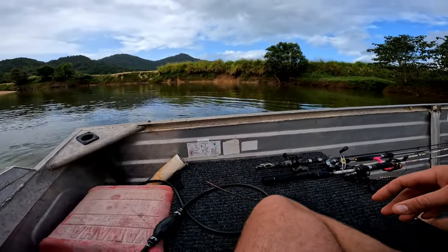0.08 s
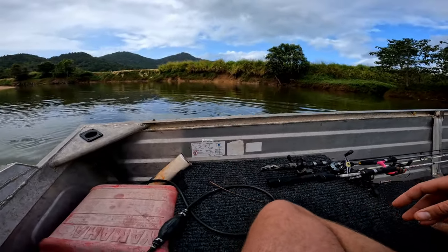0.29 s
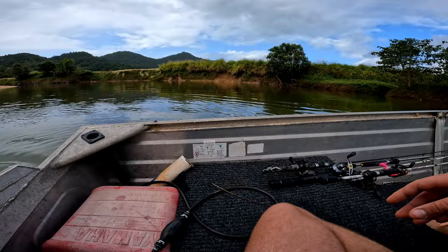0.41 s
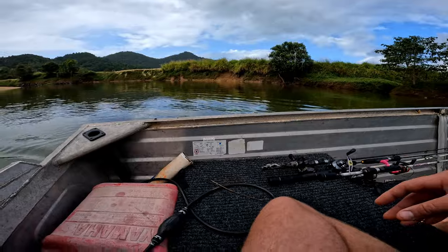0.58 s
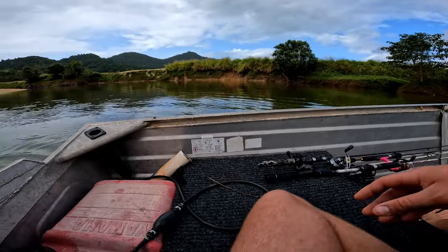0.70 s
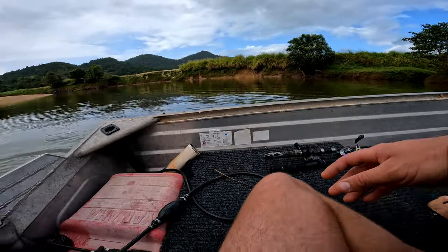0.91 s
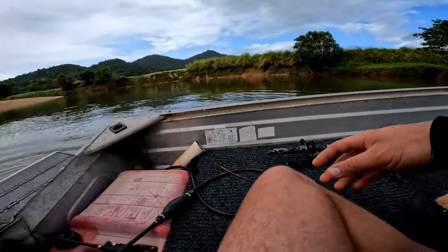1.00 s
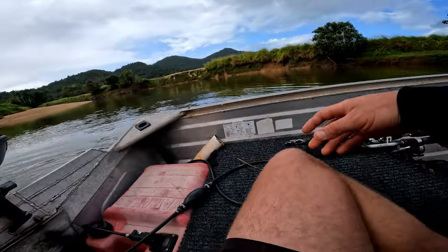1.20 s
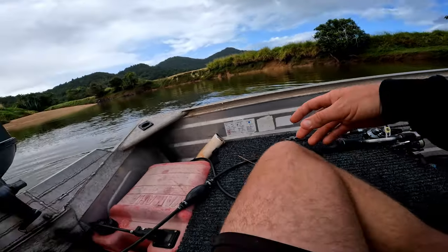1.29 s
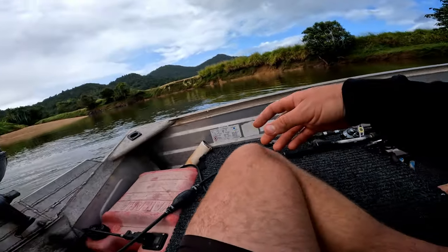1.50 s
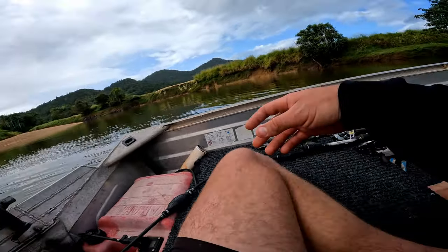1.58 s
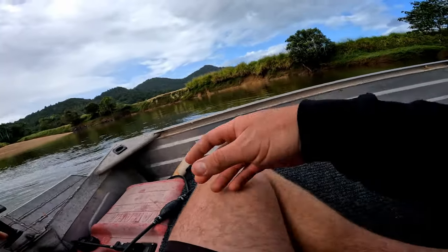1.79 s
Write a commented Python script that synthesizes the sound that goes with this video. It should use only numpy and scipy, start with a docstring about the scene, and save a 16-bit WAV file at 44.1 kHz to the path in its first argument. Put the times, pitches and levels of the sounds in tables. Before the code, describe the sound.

Something heavy shifts in a small aluminium boat, thudding, cracking and scraping on the hull in a quick burst; then a sleeve brushes, lighter knocks and two tiny metal clinks follow, heard close from a body-worn microphone outdoors.

```python
"""Inside a small aluminium boat adrift on a river, the motor silent: filtered noise for water and air, sines for hull hum.
Something heavy is shifted and knocks on the hull in a dense run of thuds; struck modes and noise boom and rattle.
Gliding tones squeak, rough noise scrapes between the blows, and hard contacts crack and ring, two after a brief slide.
Then a sleeve brushes past as smoother noise; lighter knocks follow at about one second, then more with
two clinks of a small metal fitting, made of decaying sines."""
import sys
import numpy as np
from scipy import signal
from scipy.fft import rfft, irfft, next_fast_len
from scipy.io import wavfile
from scipy.ndimage import uniform_filter1d

SR = 44100
rng = np.random.default_rng(int(sys.argv[2]) if len(sys.argv) > 2 else 0)


def file_out(sig):
    """Save sig as 16-bit WAV at sys.argv[1]."""
    # one column per channel
    cols = np.atleast_2d(sig).T
    # limit, then scale
    lim = np.clip(cols, -1, 1)
    pcm = np.round(lim * 32767).astype(np.int16)
    wavfile.write(sys.argv[1], SR, pcm)


N = 81585

# water washing along the hull: t/s, level/dB
WASH_LEVEL = [(0, -44.5), (0.15, -56.5), (0.5, -59.5), (0.8, -49), (1.0, -57.5), (1.3, -52.5), (1.5, -47.5),
              (1.6, -47.5), (1.72, -75), (1.82, -53)]
# tone of the wash: f/Hz, level/dB
WASH_COLOUR = [(30, 4), (60, -2.5), (120, -3), (330, -3.5), (440, -6), (580, -18), (1000, -34),
               (3000, -53.5), (15000, -76.5)]
# tone of the still outdoor air: f/Hz, level/dB
AIR_COLOUR = [(20, -3), (32, -3), (70, -1.5), (160, -13), (380, -28.5), (650, -45), (1000, -40),
              (1450, -36), (2500, -47), (3800, -50), (5300, -44.5), (8000, -53), (15000, -60.5)]
AIR_DB = -45.5

# swells and dips of the hull's hum: t/s, level/dB
HUM_LEVEL = [(0, -35.5), (0.2, -67), (0.55, -32.5), (0.72, -38), (0.82, -35.5), (0.93, -41.5), (1.03, -43),
             (1.17, -39.5), (1.25, -39.5), (1.45, -40), (1.7, -43.5), (1.85, -45.5)]
# partials of the hum: f/Hz, level/dB, unsteadiness/0-1
HUM_PARTIALS = [(129.6, -1.5, 0.1), (58.7, -20.5, 0), (212.8, -24.5, 0.4), (270, -20, 0.26), (290, -31, .6)]

# heavy, soft blows on the hull: t/s, relative level/dB, centre f/Hz,
# spread to each side/octaves, gain of hull ring and boom/dB
THUDS = [(0.0, -9.5, 217.6, 0.24, -7), (0.028, -15, 227, 0.097, -25), (0.179, -15.5, 183, 0.56, 3),
         (0.206, -3, 185, 1.2, 6.5), (0.224, -6, 343, 0.47, -11), (0.244, -10.5, 123, 0.97, 9),
         (0.294, -9, 170, 1.37, -4.5), (0.3296, 0, 150.4, 1.66, 1), (0.361, -20.5, 201, 0.85, -5.5),
         (0.386, -9, 153, 0.86, 4.5), (0.417, -15, 139.4, 1, 0), (0.458, -18, 84.3, 0.99, 10.5),
         (1.072, -20.5, 115.3, 1.1, -8), (1.081, -19.5, 330, 0.53, 0), (1.121, -52, 197.4, 1.1, -10),
         (1.135, -32.5, 467, 0.25, -14), (1.547, -17, 267.5, 0.42, -9), (1.554, -14.5, 130.7, 1.07, -0.5),
         (1.574, -12.5, 137, 0.81, -13.5), (1.597, -23.5, 90.5, 1.1, 2), (1.64, -21, 199, 0.33, 3),
         (1.674, -22, 50, 0.78, 3)]
# broad, quickly damped resonances of floor and sides: f/Hz, relative level/dB, t60/s
PLATE_MODES = [(57.6, -4.5, 0.17), (100, -4.5, 0.28), (124, 3, 0.1885), (152.7, -7, 0.3),
               (160.2, -4.5, 0.13), (203.2, -3, 0.15), (260.3, -3.5, 0.15), (287.2, -5.5, 0.13),
               (321.2, -4.5, 0.19), (394.3, -8.5, 0.081), (436.2, -7.5, 0.21), (486.7, -5, 0.13),
               (520.8, -16.5, 0.26)]
# long rings of the whole hull: f/Hz, relative level/dB, t60/s
HULL_MODES = [(68.18, -8, 0.81), (96, -21.5, 1), (130.2, -16.5, 0.76), (165.4, -23.5, 0.28),
              (299.36, -17, 0.73), (570.6, -22, 0.75)]
RATTLE_DB, RATTLE_T60_S, RATTLE_TOP_HZ = -18.5, 0.14, 483
BOOM_DB, BOOM_T60_S, BOOM_TOP_HZ = -22, 0.7, 194.4  # before each blow's own ring gain
PUSH_S = 0.0015  # time constant of a soft blow's onset
PUSH_TOP = 1.445  # steep treble roll-off, as a multiple of the blow's upper band edge

# faint squeaks of things sliding on metal: t/s, half length/s, f/Hz, level/dB
SQUEAKS = [(0.165, .014, 800, -48), (0.11, .06, 1400, -64), (0.797, .009, 1170, -44),
           (1.413, .009, 1760, -55)]

# the load scraping on the hull: t/s, level/dB
SCRAPE_LEVEL = [(0.14, -68.5), (0.175, -52), (0.2, -34.5), (0.235, -31.5), (0.275, -31.5), (0.31, -27),
                (0.38, -38.5), (0.42, -46.5), (0.5, -58), (0.58, -72)]
# tone of the scrape: f/Hz, level/dB
SCRAPE_COLOUR = [(100, -19.5), (300, 6), (800, 2.5), (1600, -13.5), (3000, -20.5), (6000, -33.5),
                 (10000, -39), (15000, -46.5)]

# hard contacts: t/s, relative level/dB, low edge f/Hz, high edge f/Hz,
# relative treble snap level/dB, ring t60/s
CLACKS = [(0.1698, -22.5, 390, 830, -34, 0.043), (0.2025, -12, 970, 3000, -2.5, 0.0127),
          (0.207, -7, 300, 1530, -8.5, 0.066), (0.221, -25.5, 403, 1797, -1, 0.048),
          (0.241, -19, 400, 960, -24, .12), (0.262, -21, 500, 1350, -18, 0.16),
          (0.279, -18, 467, 1210, -12.5, 0.26), (0.289, -15, 600, 1850, -5.5, 0.035),
          (0.298, -15, 500, 1460, -22, 0.052), (0.3225, -8, 750, 1280, -19, 0.073),
          (0.333, -19, 300, 760, -39, 0.094), (0.352, -26.5, 697.7, 3500, -12.5, 0.067),
          (0.365, -24.5, 500, 1800, -27, 0.16), (0.382, -21, 600, 1250, -41, 0.053),
          (0.5885, -26.5, 850, 1340, -54, 0.087), (0.687, -40.5, 453.7, 1200, -20, 0.14),
          (0.7718, -27.5, 344, 1060, -14, 0.17), (1.0825, -28, 251, 750, -13.5, 0.086),
          (1.1351, -32, 450, 810, -18, .06), (1.541, -27, 815, 2820, -0.5, 0.066),
          (1.5761, -33, 1010, 3300, -3.5, 0.03), (1.594, -42, 330, 790, -21, 0.088),
          (1.624, -59.5, 900, 4000, 16, 0.075)]
# sheet-metal rings after a hard contact: f/Hz, relative level/dB, t60/s
SHEET_MODES = [(683, -3.5, 0.15), (774, -4.5, 0.075), (816, -2, 0.13), (913, 2, 0.059), (933, -0.5, 0.046),
               (1049, -6.5, .12), (1205, -6, 0.071), (1234, -9.5, 0.11), (1393, -10, 0.047),
               (1690, -3, 0.075), (1836, -5, 0.083), (2085, -16.5, 0.059), (2700, -24, 0.087),
               (3600, -23.5, 0.1)]
SHEET_DB = -16  # modal ring against the dense noise
CRACK_S, CONTACT_S = 0.0055, 0.0011  # time constants of crack decay and contact onset
GRIT_DB = 3.0  # unevenness of the tiny contacts
SNAP_T60_S, SNAP_LOW_HZ = 0.046, 3640
BODY_TOP = 2.27  # steep treble roll-off, as a multiple of the contact's high edge

# short, bright slides building up to a hard contact: contact t/s, level/dB, build-up time constant/s
SLIDES = [(0.203, -32.5, 0.0074), (0.288, -45, .007), (1.542, -51, 0.012)]
# tone of a slide: f/Hz, level/dB
SLIDE_COLOUR = [(300, -10), (1500, -13), (2800, -1.5), (6000, -3), (8000, -16.5), (15000, -14.5)]

# sleeve brushing past: t/s, level/dB
SLEEVE_LEVEL = [(0.665, -77), (0.685, -57), (0.78, -54), (0.88, -56), (0.99, -54.5), (1.06, -61),
                (1.22, -61.5), (1.4, -58.5), (1.52, -56.5), (1.62, -61.5), (1.68, -66.5), (1.85, -66.5)]
# tone of the cloth: f/Hz, level/dB
SLEEVE_COLOUR = [(200, 1), (600, 8), (1200, 1), (2600, 1.5), (4000, -3.5), (6000, -8.5), (9000, -10),
                 (12500, -8), (15500, -11.5)]

# clinks of a small metal fitting: t/s, level/dB
CLINKS = [(1.54, -38.5), (1.577, -39.5)]
# modes of the fitting: f/Hz, relative level/dB, t60/s
FITTING_MODES = [(2600, -4, 0.076), (3240, -7, 0.024), (4226, -18.5, 0.15), (6070, -14, 0.08),
                 (10100, -11, .04), (12080, -15.5, 0.041)]

# microphone colour: f/Hz, left level/dB, right level/dB
MIC_COLOUR = [(20, 0, 0), (4500, -0.5, -0.5), (6230, 1, 1), (6720, -5.5, -6), (9300, -7.5, -8.5),
              (9200, -2, -2.5), (10900, -12.5, -11), (11350, -12.5, -6.5), (11970, 2.5, -13.5),
              (13600, -1, -25), (14100, -29.5, -23), (16000, -16.5, -10)]
TOP_HZ = 15800


def undb(db):
    """Decibels to gain."""
    return 10 ** (np.asarray(db) / 20)


def unit(x):
    """Scale to rms 1."""
    return x / np.sqrt(np.mean(x ** 2))


def curve(points):
    """Gain over time, drawn straight in dB between (t/s, level/dB) points."""
    times, levels = np.array(points).T
    return undb(np.interp(np.arange(N) / SR, times, levels))


def colour(x, points):
    """Minimum-phase filter through (f/Hz, level/dB) points."""
    size = next_fast_len(N + 8192, real=True)
    size += size % 2
    hz, db = np.array(points, float).T
    bins = np.fft.rfftfreq(size, 1 / SR)
    gain = undb(np.interp(np.log(bins + 1), np.log(hz), db))
    # folding the cepstrum forward makes the filter causal
    cepstrum = irfft(np.log(gain))
    cepstrum[1:size // 2] *= 2
    cepstrum[size // 2 + 1:] = 0
    response = np.exp(rfft(cepstrum))
    return irfft(rfft(x, size) * response)[:N]


def edge(x, hz, kind, order=2):
    """Low-pass or high-pass."""
    corner = min(hz, SR / 2 - 1000)
    return signal.sosfilt(signal.butter(order, corner, kind, fs=SR, output="sos"), x)


def fade(t, t60):
    """Exponential decay, down 60 dB after t60 seconds."""
    return np.exp(-np.log(1000) * t / t60)


def ring(modes, t, scatter_db=0):
    """Struck modes as decaying sines; scatter varies their strengths as the spot that is hit would."""
    out = np.zeros(len(t))
    for hz, db, t60 in modes:
        strength = undb(db + scatter_db * rng.standard_normal())
        out += strength * fade(t, t60) * np.sin(2 * np.pi * hz * t)
    return out


def grit(size, rough_db):
    """Noise made of tiny contacts, its strength jumping 1500 times a second."""
    hold = SR // 1500
    steps = np.repeat(rng.standard_normal(size // hold + 1), hold)[:size]
    return unit(rng.standard_normal(size) * undb(rough_db * steps))


def walk(rate):
    """Smooth random drift of rms 1, with a new target rate times a second."""
    k = max(int(SR / rate), 1)
    steps = np.repeat(rng.standard_normal(N // k + 1), k)[:N]
    return unit(uniform_filter1d(uniform_filter1d(steps, k), k))


def add(out, start, x):
    """Mix a sound in at its time."""
    i = max(int(start * SR), 0)
    out[i:i + len(x)] += x[:N - i]


def river():
    """Water washes against the hull as unsteady noise, under faint steady outdoor air."""
    wash = unit(colour(rng.standard_normal(N), WASH_COLOUR))
    wash = wash * curve(WASH_LEVEL) * undb(1.5 * walk(19.1))
    air = unit(colour(rng.standard_normal(N), AIR_COLOUR)) * undb(AIR_DB)
    return wash + air


def hum():
    """The hull hums in low partials; most waver in strength and phase."""
    t = np.arange(N) / SR
    partials = np.zeros(N)
    for hz, db, unsteadiness in HUM_PARTIALS:
        waver = 1 + unsteadiness * (walk(12.3) + 1j * walk(16))
        partials += undb(db) * np.real(waver * np.exp(2j * np.pi * hz * t))
    return unit(partials) * curve(HUM_LEVEL)


def thuds():
    """Soft blows push the plates, set the whole hull booming and shake loose gear."""
    out, t = np.zeros(N), np.arange(SR) / SR
    plates, hull = ring(PLATE_MODES, t), ring(HULL_MODES, t)
    for start, db, hz, octaves, ring_db in THUDS:
        rattle = unit(edge(rng.standard_normal(len(t)), RATTLE_TOP_HZ, "low", order=4))
        rattle = rattle * fade(t, RATTLE_T60_S) * undb(RATTLE_DB)
        boom = unit(edge(rng.standard_normal(len(t)), BOOM_TOP_HZ, "low", order=3))
        boom = boom * fade(t, BOOM_T60_S) * undb(BOOM_DB)
        modes = undb(-12) * (plates + undb(ring_db) * hull)
        body = modes + rattle + undb(ring_db) * boom

        # a narrow or wide push picks which part of the body speaks
        spread = 2 ** np.clip(octaves, .1, 3)
        push = signal.butter(2, [hz / spread, hz * spread], "band", fs=SR, output="sos")
        body = edge(body, PUSH_TOP * hz * spread, "low", order=4)
        onset = 1 - np.exp(-t / PUSH_S)
        add(out, start, -undb(db) * signal.sosfilt(push, body * onset))
    return out


def squeaks():
    """Things squeak as they slide on metal: short swelling tones of unsteady pitch."""
    out, t = np.zeros(N), np.arange(N) / SR
    for at, half_length_s, hz, db in SQUEAKS:
        pitch = hz * (1 + 0.018 * walk(150))
        swell = np.exp(-((t - at) / half_length_s) ** 2)
        out += undb(db) * swell * np.sin(2 * np.pi * np.cumsum(pitch) / SR)
    return out


def scrape():
    """The load scrapes on the hull among its blows: rough noise that stops at its last level point."""
    rough = unit(colour(grit(N, rough_db=2), SCRAPE_COLOUR))
    moving = np.arange(N) / SR < SCRAPE_LEVEL[-1][0]
    return rough * curve(SCRAPE_LEVEL) * moving


def clacks():
    """Hard contacts: a crack, a dense tinny ring of the sheet metal and a short bright snap."""
    out, t = np.zeros(N), np.arange(SR // 2) / SR
    for start, db, low_hz, high_hz, snap_db, t60 in CLACKS:
        decay = fade(t, max(t60, .01)) + 0.89 * np.exp(-t / CRACK_S)
        dense = grit(len(t), GRIT_DB) * decay
        body = dense + undb(SHEET_DB) * ring(SHEET_MODES, t, scatter_db=5.0)
        body = edge(edge(body, low_hz, "high"), high_hz, "low")
        body = edge(body, BODY_TOP * high_hz, "low", order=4)
        snap = edge(grit(len(t), GRIT_DB), SNAP_LOW_HZ, "high", order=1)
        snap = snap * fade(t, SNAP_T60_S) * undb(snap_db - 6)
        onset = 1 - np.exp(-t / CONTACT_S)
        add(out, start, undb(db - 3.5) * (body + snap) * onset)
    return out


def slides():
    """Surfaces slide for an instant before they meet: bright noise swells, then stops dead."""
    t, swell = np.arange(N) / SR, np.zeros(N)
    for at, db, rise_s in SLIDES:
        swell += undb(db) * np.exp(-np.abs(t - at) / rise_s) * (t < at)
    return swell * unit(colour(rng.standard_normal(N), SLIDE_COLOUR))


def sleeve():
    """Cloth slides past: noise with a milder grain than the scrape and a slight drift in level."""
    cloth = unit(colour(grit(N, rough_db=1.5), SLEEVE_COLOUR))
    return cloth * curve(SLEEVE_LEVEL) * undb(0.72 * walk(34.93))


def clinks():
    """A small metal fitting rings in its own modes as it is knocked."""
    out, t = np.zeros(N), np.arange(SR // 2) / SR
    for start, db in CLINKS:
        add(out, start, undb(db) * ring(FITTING_MODES, t, scatter_db=4.5))
    return out


def scene():
    """Everything is close and in the open air, placed in the middle."""
    background = river() + hum()
    load = thuds() + squeaks() + scrape() + clacks() + slides()
    boat = background + load + sleeve() + clinks()
    return np.array([boat, boat])


def record(dry):
    """Two body-worn microphone ports, differing only in the treble; a steep filter cuts the top."""
    mic = np.array(MIC_COLOUR, float)
    left = colour(dry[0], mic[:, [0, 1]])
    right = colour(dry[1], mic[:, [0, 2]])
    top_cut = signal.ellip(8, .2, 70, TOP_HZ, fs=SR, output="sos")
    return signal.sosfilt(top_cut, np.array([left, right]))


dry = scene()
out = record(dry)
file_out(out)
```